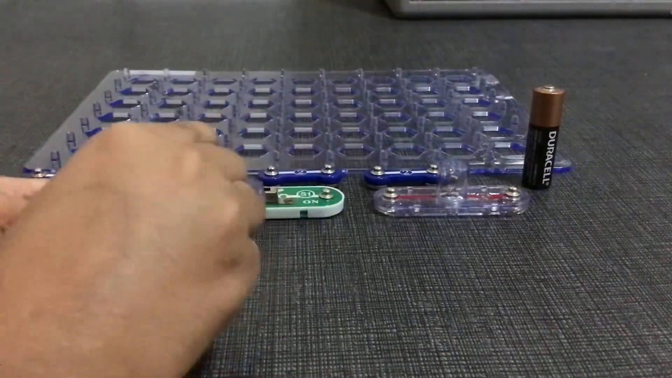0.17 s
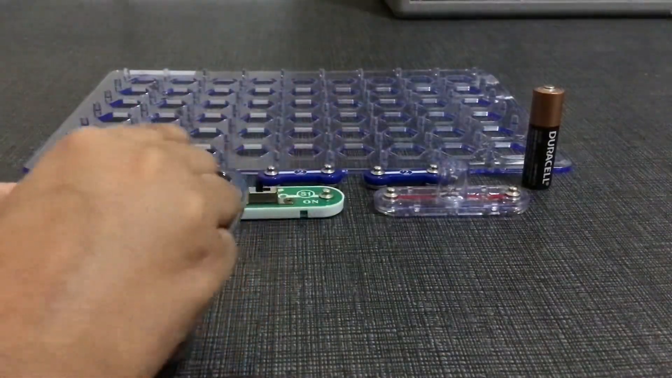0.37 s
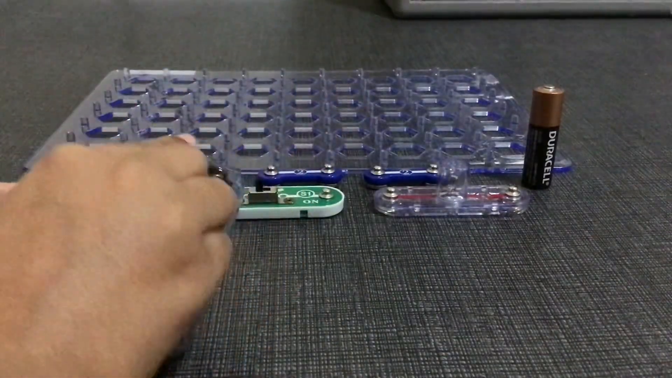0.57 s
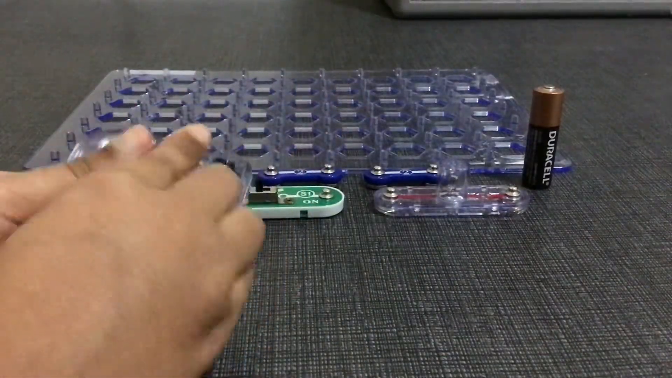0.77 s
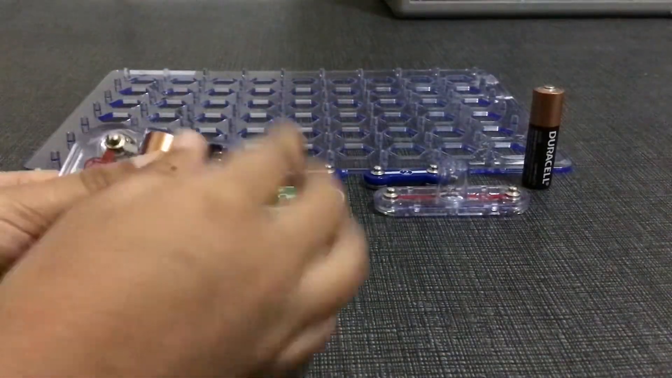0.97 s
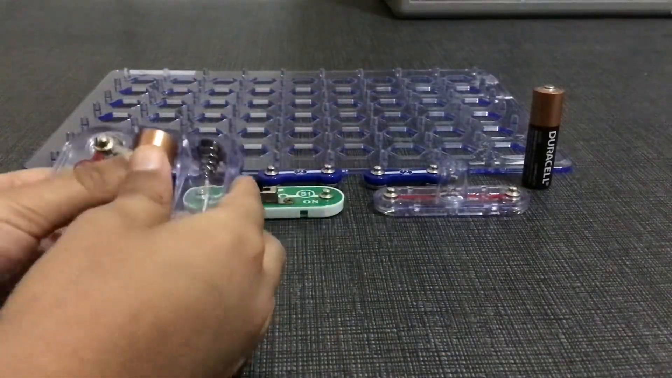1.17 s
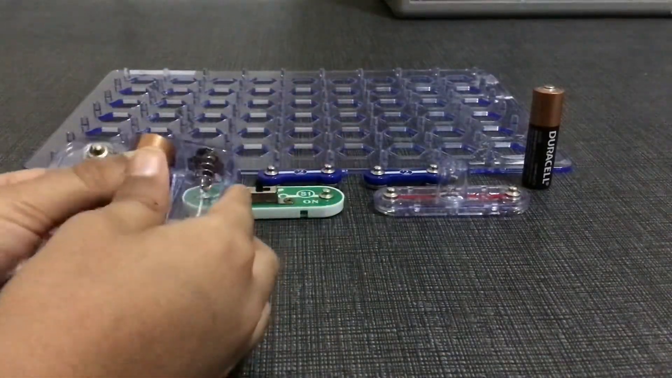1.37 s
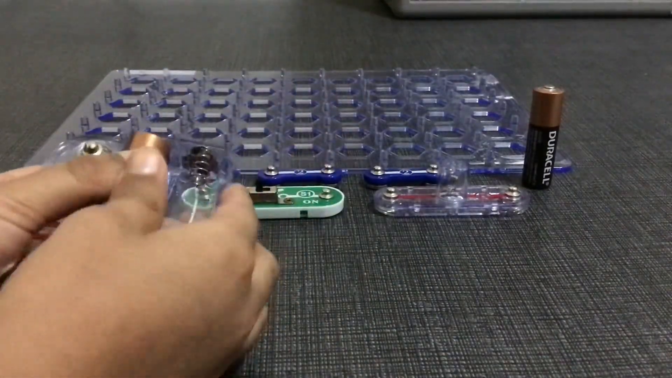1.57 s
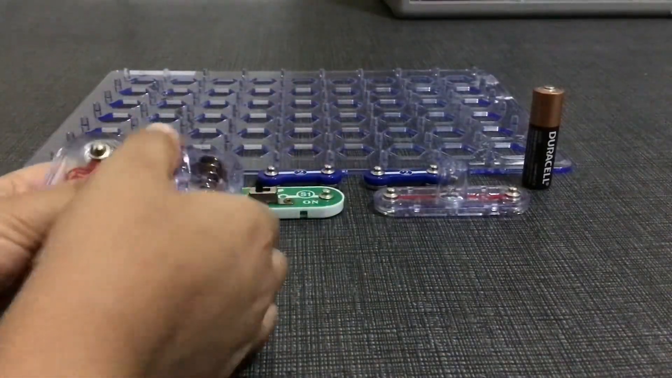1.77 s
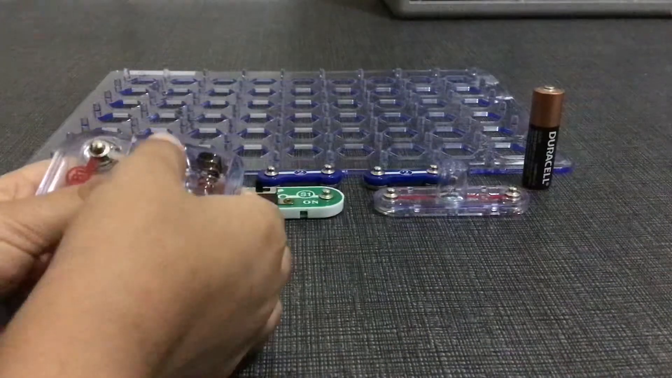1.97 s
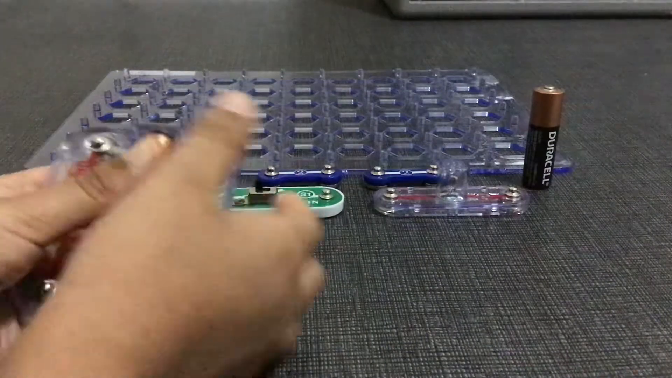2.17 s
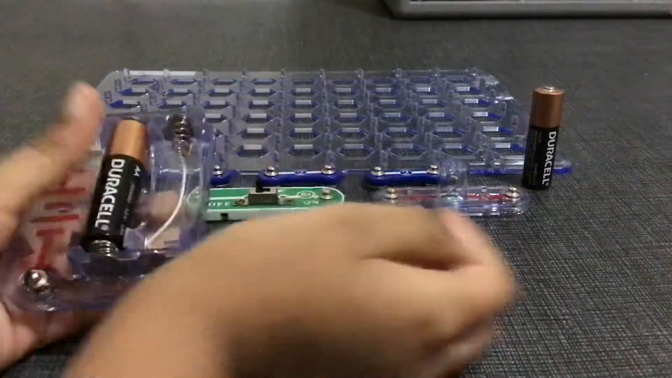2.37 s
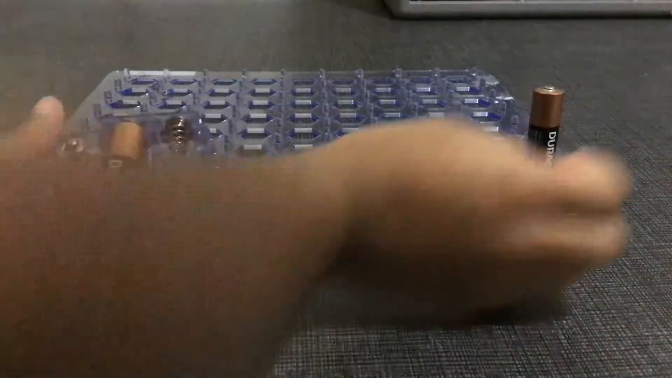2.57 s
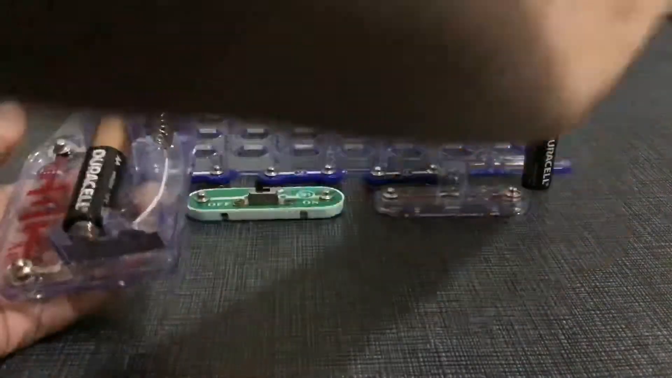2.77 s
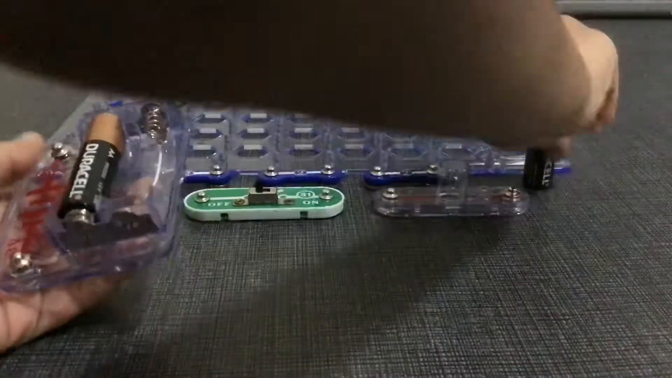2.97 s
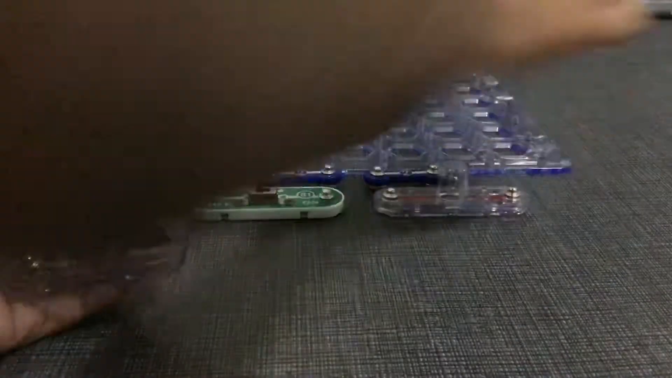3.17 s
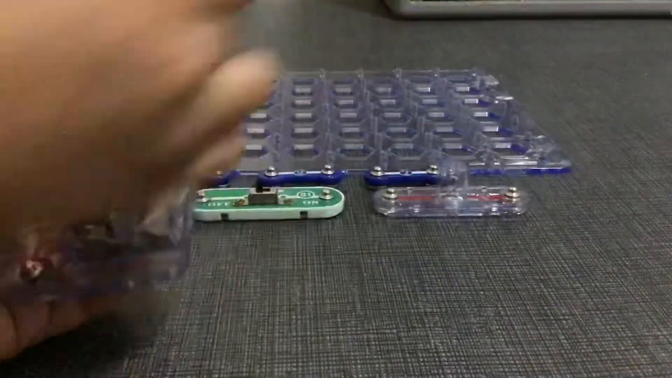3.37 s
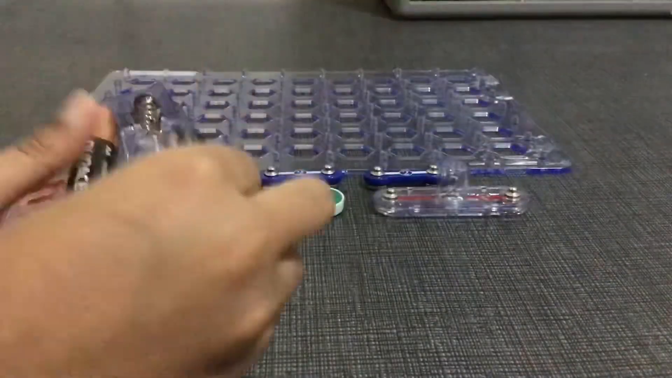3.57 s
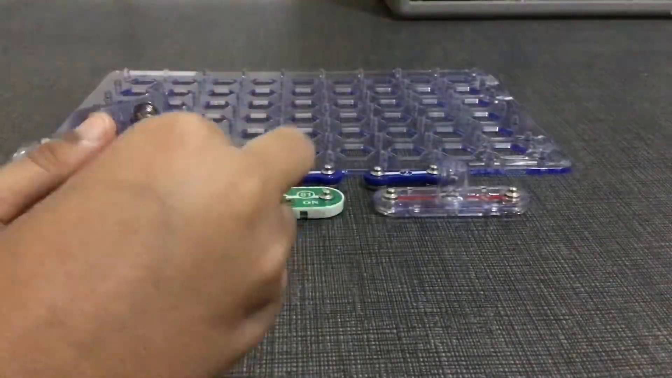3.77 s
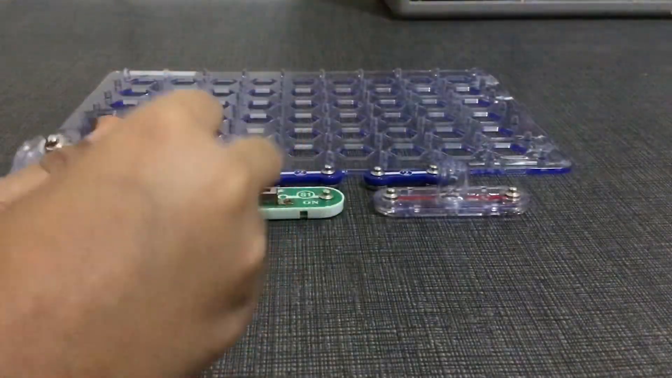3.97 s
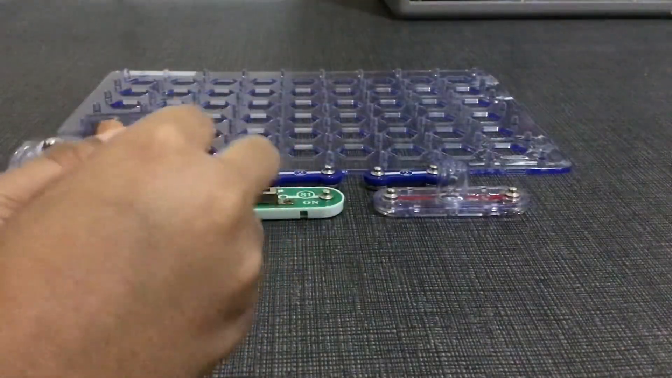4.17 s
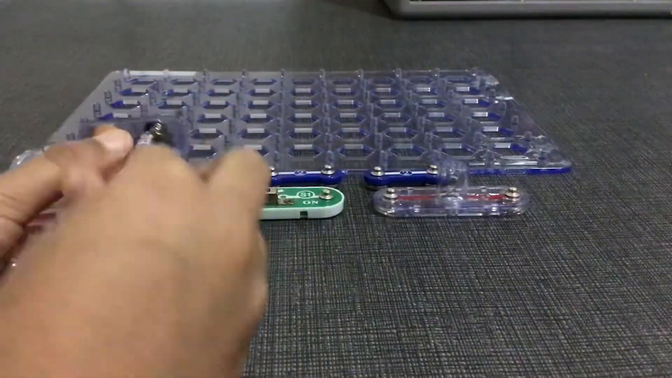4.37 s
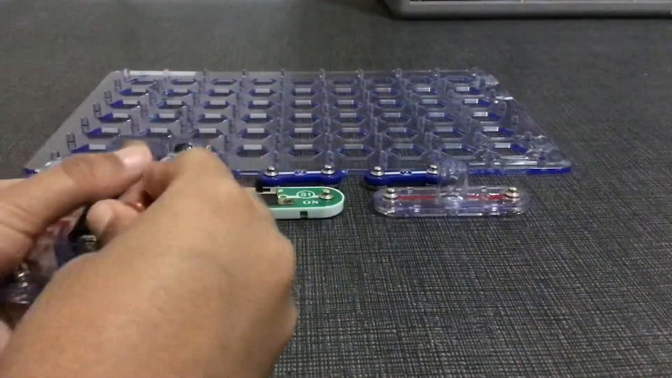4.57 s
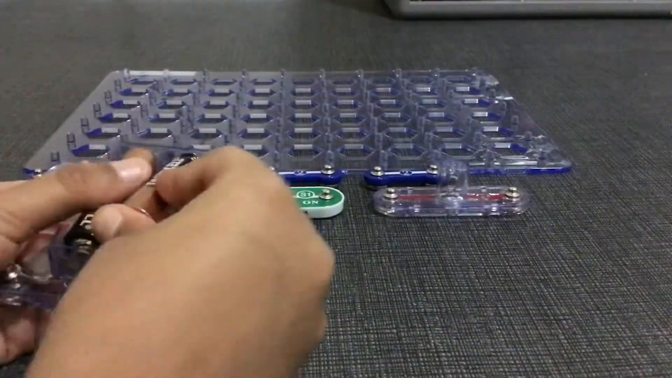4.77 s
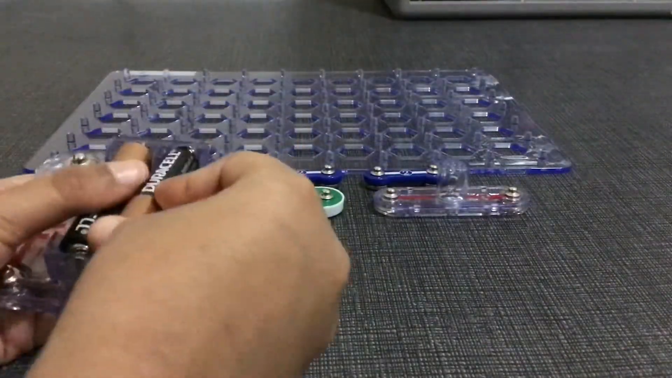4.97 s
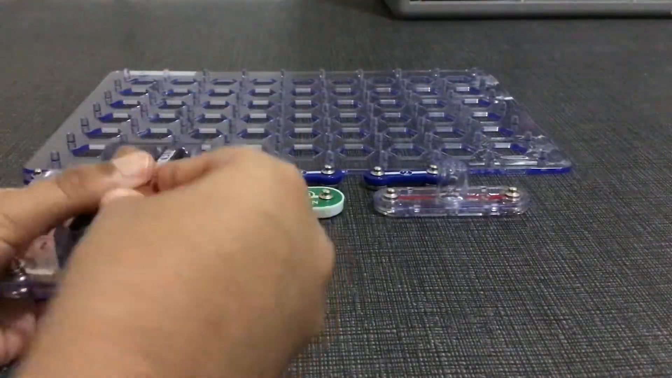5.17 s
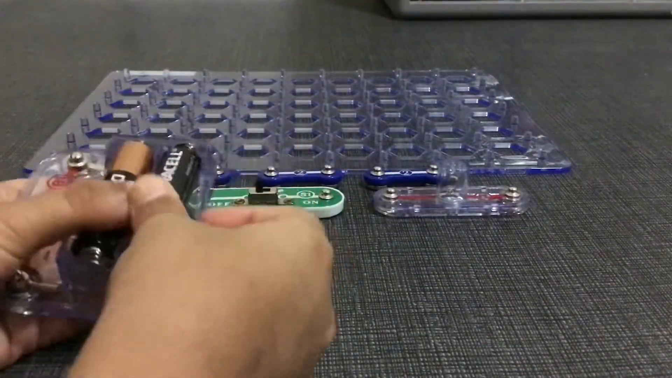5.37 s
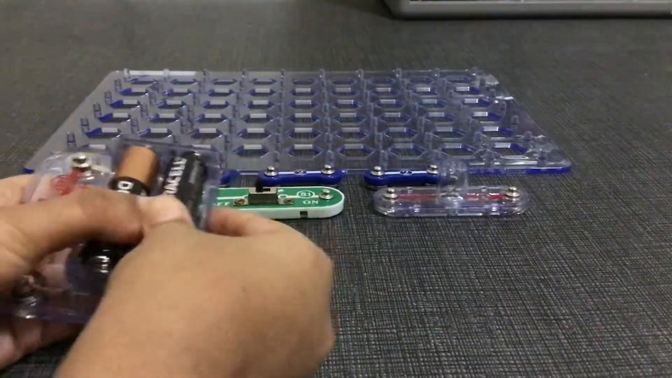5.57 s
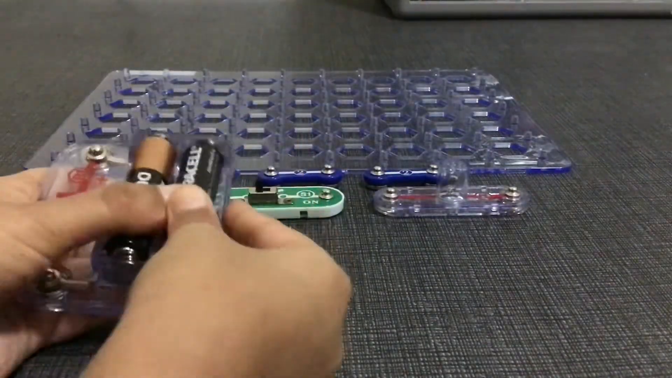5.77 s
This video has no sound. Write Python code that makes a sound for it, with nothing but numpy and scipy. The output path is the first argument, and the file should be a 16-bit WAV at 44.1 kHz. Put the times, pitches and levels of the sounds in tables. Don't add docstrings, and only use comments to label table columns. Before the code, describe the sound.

Close recording of hands fitting two batteries into a plastic holder over a table. Small ticks, soft bumps and skin rubs surround a few very sharp snaps: one at the start, a very loud one before two seconds, then a cluster near four seconds and two more past five. Metal springs ring thinly after the hits, and the room answers briefly over quiet low rumble.

```python
import sys
import numpy as np
from scipy import signal
from scipy.fft import rfft, irfft
from scipy.io import wavfile
from scipy.ndimage import uniform_filter1d

SR = 44100
rng = np.random.default_rng(int(sys.argv[2]) if len(sys.argv) > 2 else 0)


def undo_db(level):
    steps = np.asarray(level, float) / 20
    return 10 ** steps


def materialize(psi):
    bounded = np.clip(np.atleast_2d(psi).T, -1, 1)
    quanta = np.round(bounded * 32767).astype(np.int16)
    wavfile.write(sys.argv[1], SR, quanta)


N = 257169
T = np.arange(N) / SR

# (pitch [Hz], width [Hz], level [dB])
FAN = [
    (296, 1.1, -80.5),
    (486, 1.1, -85),
    (594, 2.6, -85.5),
]
# (time [s], level [dB])
RUMBLE = [(0.3, -69.5), (0.93, -71), (1.07, -71), (1.45, -73), (1.76, -69.5), (1.92, -78.5), (2.15, -77.5),
          (2.47, -74), (3.13, -71.5), (4.18, -71.5), (4.94, -68.5), (5.09, -71.5), (5.31, -73), (5.83, -68)]
RUMBLE_DB, RUMBLE_SWAY_DB = 2, 1.5
SHAKE_DB, SHAKE_DB_PER_S = -46, 186
# (frequency [Hz], level [dB per Hz])
AIR = [(18, -46), (32, -25.5), (65, 0), (118, -2.5), (167, -5), (291, -7.5), (323, -9.5), (432, -12.5),
       (493, -14), (792, -27), (979, -29), (1570, -32.5), (9230, -40.5), (14800, -40.5), (16500, -51.5)]
HISS_DB = -79.5

# (time [s], peak [dB], lead-in before it [dB re peak], room send [dB], treble [dB])
SNAPS = [
    (0.0064, -24.5, -60, -24, -29),
    (1.8104, -1.66, -20.5, -18.5, -39),
    (3.5584, -16, -41, -24, -34),
    (3.6682, -30, -47, -25.5, -20),
    (3.9524, -6, -37, -26, -31.5),
    (5.2097, -7.5, -41.5, -27.5, -33.5),
    (5.5309, 1.5, -33.5, -25, -33),
]
# (pitch [Hz], width [Hz], level [dB])
GRIPS = [
    [(556, 160, 12.5), (1120, 130, 10), (1730, 320, 12), (2510, 220, 10), (4000, 140, -8), (5360, 390, -15),
     (6800, 180, -23)],
    [(2260, 230, 1.5), (2900, 540, -3), (3600, 530, -11), (4200, 590, -18.5), (5340, 260, -21.5),
     (7730, 860, -19.0), (7950, 200, -22.5), (9100, 200, -28.5), (10500, 160, -33.0), (11000, 1700, -25.5),
     (13400, 500, -23.5)] + [(520, 120, -10.0), (2000, 340, -16.5)],
]
# (pitch [Hz], width [Hz], level [dB])
PUSH_GRIPS = [
    [(1548, 460, -5.0), (1970, 56, 2.0), (2640, 263, 4.5), (3170, 100, -2.5), (3620, 310, 2.5), (4466, 217, -4.5), (5800, 201, -16), (8620, 69, -24.5)] + [(1050, 540, -25.5)],
    [(1505, 960, -14.5), (2720, 262, 5), (3900, 610, -5), (5630, 560, -14), (11860, 910, -8.5), (15000, 740, -4.5)],
    [(2590, 370, 0), (3450, 230, 1), (3960, 510, -1), (4670, 140, 0.5), (6050, 107, -9.5), (6850, 230, -13.5), (7900, 150, -34.5), (9450, 800, -29.5), (10160, 100, -30.5), (11700, 160, -27.5)] + [(1700, 379.4, -12.0), (1970, 350, -7)],
]
# (pitch [Hz], width [Hz], level [dB])
SEAT_GRIPS = [
    [(575, 150, -25.5), (987, 184, -15.5), (1895, 130, -3), (2300, 260, -5), (2950, 150, 5),
     (3600, 330, -11.5), (4150, 580, -6), (4600, 170, -17.5), (5990, 130, -21), (7300, 1100, -22.5),
     (11750, 3100, -22.5)],
    [(1140, 160, -21), (2200, 550, -8), (2500, 130, -21.5), (2955, 390, -0.5), (4000, 400, -8),
     (4470, 450, -9.5), (5640, 920, -14), (8270, 190, -22.5), (9600, 500, -15.5), (11470, 240, -20),
     (15000, 520, -27)],
]
# (time after its start [ms], level over the chatter [dB])
HITS = [
    [(1.0, 34), (2.2, 13)],
    [(-0.7, 14), (2.15, 27.5), (3.5, 12)],
    [(.3, 19.5), (.9, 19), (1.9, 17), (3.6, 12)],
    [(.2, 10.5), (2.4, 15), (6, 5.5), (9, 1.5)],
    [(.3, 21), (1.85, 24.5), (2.9, 14.5)],
    [(.5, 10.5), (1.4, 13), (2.2, 19), (2.95, 24)],
    [(.9, 19), (1.4, 24.5), (1.8, 20.5), (2.6, 17)],
]
# (frequency [Hz], level [dB per Hz])
RADIATED = [
    [(410, -42), (700, -10), (2180, -8), (2490, -9), (3330, -29), (12000, -45), (16500, -74.5)],
    [(290, -63.5), (500, -26.5), (1040, -26.5), (1280, -33), (1500, -22.5), (2200, -5.5), (2600, -16),
     (3700, -24.5), (4200, -20.5), (5350, -23.5), (12500, -30), (15600, -34), (16500, -57)],
    [(350, -18.5), (600, -15.5), (1270, -11), (1520, -0.5), (1790, -12.5), (4480, -7), (5590, -20),
     (12500, -36), (16500, -45.5)],
    [(530, -52), (900, -22.5), (2690, -5), (3310, -13), (14300, -15), (16500, -27.5)],
    [(350, -58.5), (600, -27), (1560, -8), (2180, -11.5), (2650, 0.5), (2960, -14.5), (4300, -6.5),
     (13800, -36), (16500, -40)],
    [(350, -58), (600, -20), (1400, -17), (1650, -8), (2950, -2.5), (3400, -14.5), (4540, -14.5),
     (15200, -21.5), (16500, -46)],
    [(290, -61), (500, -30.5), (1040, -9), (1450, -12.5), (1900, -3), (2940, 0), (3450, -12), (4400, -6.5),
     (15100, -21), (16500, -43.5)],
]
SNAP_RATTLE_MS, SNAP_CRACK_DB = 2.5, -23
LEAD_MS = 2
GRIP_MS, GRIP_DB_PER_MS = 1.9, 1.5
LEAD_IN_S = .0222
# (pitch [Hz], width [Hz], level [dB])
SQUEAK = (8000, 260, -12)
RING_SEND_DB = -12

# (delay [s], level [dB])
ECHOES = [
    (.0042, -18),
    (.013, -25),
]
# (frequency [Hz], time to fall 60 dB [s])
ROOM_T60 = [(300, 0.3), (1000, 0.33), (2500, .34), (5000, .36), (9000, 0.3), (13000, 0.16), (16000, 0.24)]

# (time [s], level [dB], first pitch [Hz], last pitch [Hz], length [ms])
THUDS = [(.008, -39, 923, 85, 15), (0.085, -46, 900, 64, 14), (.086, -52, 300, 480, 4),
         (3.56, -58, 900, 100, 10), (3.956, -55, 600, 50, 25), (5.212, -54, 1000, 200, 5),
         (5.536, -54, 500, 50, 30), (1.8115, -20.5, 1395, 8, 27)]
GLIDE_CYCLES = 2.09
# (time [s], level [dB], low pitch [Hz], high pitch [Hz], high level [dB])
BUMPS = [(.012, -34.5, 138.6, 368, -2), (.165, -49.5, 118, 246, -24), (.326, -39.5, 163.4, 230, -6),
         (.655, -55, 95, 158, -1), (1.045, -51.5, 144, 236, -11.5), (1.644, -52, 145, 308, 3),
         (3.008, -42, 167, 269, 1.5), (3.01, -46.5, 392.5, 618, -2.7), (4.618, -51, 212, 297, 4.5),
         (4.871, -49.5, 82, 143, -0.5), (5.534, -56.5, 118, 303, 9)]
BUMP_CYCLES = 15

# (time [s], pitch [Hz], level [dB], swell
# [ms], stopped at [s])
HUMS = [(0.052, 296, -57.5, 62, 1.1), (.42, 372.3, -60, 160, 0.83), (1.451, 272.8, -66.5, 15, 2.2),
        (1.5, 305.7, -67.5, 19, 1.9), (1.829, 477.3, -67.5, 5.7, 3.3)]
HUM_T60_S = 3.1
FINGER_DB_PER_S = 299

# (time [s], peak [dB], main pitch [Hz], treble [dB], rattle length [ms])
TICKS = [(0.0832, -48.5, 2300, -36, 1.5), (0.148, -55, 2300, -7.5, 4.2), (0.304, -62, 2220, -39, 2.7),
         (0.323, -39.5, 2450, -15.5, 3), (0.3445, -44.5, 2180, -9, 2.2), (0.4506, -56.5, 2260, -11, 1.8),
         (0.507, -31.5, 2324, -19.5, 1.03), (0.638, -57.5, 2500, -6, 3), (0.903, -58.5, 2300, -7, 2.7),
         (1.12, -55, 1140, -11, 1.5), (1.638, -67, 2684, -16, 1.9), (1.753, -42.5, 3200, -7, 7.9),
         (3.007, -54, 1000, -28, 2), (3.7595, -58.5, 3626, -20, 2.9), (4.2418, -44, 2905, -20, 2.33),
         (4.2533, -48.5, 2720, -25.5, 1.92), (4.4193, -59.5, 3960, -14, 2), (4.528, -56, 1232, -1, 1.4),
         (4.6159, -53, 4000, -12, 2), (4.667, -38.5, 2950, -45, 2.96), (4.708, -55, 2380, -25, 2.26),
         (4.8663, -45.5, 2640, -10, 6.4), (5.0596, -61.5, 2600, -11, 2.6)]
# (pitch [Hz], width [Hz], level [dB])
PLASTIC = [(1000, 320, -11), (1800, 340, -4), (2600, 230, -7), (4000, 570, -12.5), (6350, 300, -36)]
TICK_HIT_DB, TICK_HIT_AT = 14.5, .45
# (time [s], peak [dB], length [ms], main pitch
# [Hz], second pitch [Hz])
SCRAPES = [(0.152, -64, 20, 2260, 2500), (0.44, -67.5, 37, 2260, 2940), (0.807, -56, 13, 4850, 9250),
           (0.829, -64, 17, 4530, 9500), (0.886, -69, 24, 8150, 5600), (2.305, -66, 3, 15000, 10970),
           (0.511, -60, 6, 5470, 3600), (0.863, -49.5, 16, 6830, 8500), (0.867, -58, 14, 4100, 12700),
           (1.801, -39, 3, 2300, 2900), (3.671, -43, 8.7, 4300, 6515), (4.867, -49.5, 6, 6300, 4000),
           (4.242, -60.5, 2.9, 6000, 4100), (4.655, -67, 14, 5500, 4400), (3, -63, 10.5, 2405, 1050),
           (3.572, -30.5, 1.9, 2680, 3060), (3.9634, -23, 6.2, 2640, 3650), (4.136, -55.5, 7.3, 1700, 2600),
           (4.466, -57, 8.7, 2190, 2870), (4.482, -62.5, 14, 3620, 4310), (4.619, -57.5, 35, 2300, 2760),
           (4.626, -57, 2.2, 12580, 11400), (4.838, -60, 2.76, 12600, 15000), (4.877, -51, 5.8, 8780, 2980),
           (4.936, -69, 2.4, 15000, 13620), (5.084, -63, 3.8, 14470, 12720), (5.545, -30, 2.4, 2700, 5130)]

# (start [s], firmest [s], end [s], level [dB], drop at the ends [dB])
RUBS = [(0.64, 0.834, 1.01, -80.5, 11), (1.563, 1.672, 1.77, -85.5, -2.5), (2.17, 2.266, 2.66, -80.5, 12),
        (2.316, 2.405, 2.47, -71.5, 9), (2.411, 2.499, 2.3, -70.5, 2), (4.21, 4.279, 4.61, -80.5, 7),
        (4.792, 4.849, 5.15, -81.5, 16.5)]
# (frequency [Hz], level [dB per Hz])
RUB = [(590, -63.5), (1100, -14), (2250, -8.5), (3050, -3.5), (6460, -7.5), (8000, -8.5), (14800, -5.5),
       (15900, -6.5), (16500, -45.5)]

# (pitch [Hz], width [Hz], level [dB], time to fall 60 dB [s])
SLOT = [
    (2235, 150, -30, 0.45),
    (4400, 300, -47, .35),
    (5250, 350, -47, .45),
]
SLOT_S, SLOT_SWELL_MS = 1.815, 22
LOW_HZ, PAIR_LOW_HZ, PAIR_HIGH_HZ, TOP_HZ = 1898, 3499, 3638, 4366
# (time [s], pitch [Hz], level [dB], time to fall 60 dB [s], stopped at [s])
SPRINGS = [(1.83, PAIR_HIGH_HZ, -67, 1.1, 2.15), (3.562, LOW_HZ, -60, 0.63, 3.9),
           (3.562, PAIR_HIGH_HZ, -60, .95, 3.93), (3.562, PAIR_LOW_HZ, -63, 1.1, 3.93),
           (3.562, TOP_HZ, -47.5, 0.26, 3.7), (3.562, 1532, -46, 0.2, 4.9), (3.562, 2670, -45, 0.23, 4.7),
           (3.562, 3980, -51, 0.24, 4.6), (3.562, 3140, -54, 0.2, 4.6),
           (3.956, PAIR_LOW_HZ, -46, .65, 4.19), (3.956, PAIR_HIGH_HZ, -53, 0.55, 4.19),
           (3.955, 2630, -49, 0.39, 5.8), (3.956, 4350, -46, .2, 5.1), (3.956, 4010, -50, .2, 5),
           (3.956, 4700, -49.5, .2, 5.7), (3.956, 2500, -52, .3, 4.3), (1.82, 4360, -50, .25, 2.2),
           (3.956, LOW_HZ, -66, 0.97, 4.2), (4.968, 2680, -74, 0.32, 5.1), (4.968, 3260, -70, 0.11, 5.4),
           (4.968, 3850, -65, 0.087, 4.9)]
PLUCK_MS = 2.8


def rms_one(x):
    return x / np.sqrt(np.mean(x ** 2) + 1e-20)


def at_hz(points, hz):
    table_hz, values = np.transpose(points)
    return np.interp(np.log(hz + 1), np.log(table_hz), values)


def shape(x, spectrum):
    gain = undo_db(at_hz(spectrum, np.fft.rfftfreq(len(x), 1 / SR)))
    return irfft(rfft(x) * gain, len(x))


def coloured(spectrum):
    return rms_one(shape(rng.standard_normal(N), spectrum))


def drift(rate):
    steps = rng.standard_normal(int(N / SR * 40) + 2)
    memory = np.exp(-2 * np.pi * rate / 40)
    smooth = rms_one(signal.lfilter([1], [1, -memory], steps))
    return np.interp(T * 40, np.arange(len(steps)), smooth)


def resonate(x, hz, width):
    r = np.exp(-np.pi * width / SR)
    top = (1 - r * r) / 2
    return signal.lfilter([top, 0, -top], [1, -2 * r * np.cos(2 * np.pi * hz / SR), r * r], x)


def add(out, s, sound):
    i = round(s * SR)
    out[i:i + len(sound)] += sound[:N - i]


def swell(s, t60, swell_ms):
    t = np.maximum(T - s, 0)
    return (1 - np.exp(-t * 1000 / swell_ms)) * undo_db(-60 * t / t60)


def air():
    fan = np.zeros(N)
    for hz, width, db in FAN:
        level = undo_db(db + 1.5 + 1.8 * drift(width))
        fan += level * np.sin(2 * np.pi * hz * T + drift(width))
    no_bass = signal.butter(4, 48, "high", fs=SR, output="sos")
    noise = signal.sosfilt(no_bass, coloured(AIR))
    low = signal.sosfiltfilt(signal.butter(2, 700, fs=SR, output="sos"), noise)
    rumble_db = RUMBLE_DB + np.interp(T, *np.transpose(RUMBLE)) + RUMBLE_SWAY_DB * drift(3.6)
    rumble_level = undo_db(rumble_db) + undo_db(SHAKE_DB - SHAKE_DB_PER_S * T)
    return rumble_level * rms_one(low) + undo_db(HISS_DB) * rms_one(noise - low) + fan


def shake(modes, force, strike=0):
    unevenness = undo_db(1.8 * rng.standard_normal(len(force)))
    chatter = strike + force * rng.standard_normal((len(modes), len(force))) * unevenness
    body = np.zeros(len(force))
    for push, (hz, width, db) in zip(chatter, modes):
        ring = resonate(resonate(push, hz, width), hz, 2.2 * width)
        body += undo_db(db) * np.sqrt(width) * rms_one(ring)
    return body / np.abs(body).max()


def contact(modes, rattle_ms, crack_db, treble_db, hits):
    ms = np.arange(2700) / SR * 1000 - LEAD_MS
    t = np.clip(ms * .8 / rattle_ms, 0, 1)
    rattle = t ** 0.25 * (1 - t) ** 0.39
    strike = np.zeros(len(ms))
    for at_ms, db in hits:
        strike[np.argmax(ms > at_ms)] += undo_db(db)
    crack = [(3200, 1700, crack_db), (11100, 3500, treble_db)]
    damp_from_ms = max(hits[-1][0], rattle_ms) + GRIP_MS
    grip = undo_db(-GRIP_DB_PER_MS * np.maximum(ms - damp_from_ms, 0))
    return grip * shake(modes + crack, rattle, strike)


def lead_in(modes):
    t = np.arange(round(LEAD_IN_S * SR)) / SR
    first_tick = 1.2 * np.exp(-t / 0.00044)
    scrape = 0.06 + 1.5 * np.exp((t - LEAD_IN_S) / .006)
    lower_modes = [mode for mode in modes if mode[0] < 9000]
    return shake(lower_modes + [SQUEAK], first_tick + scrape)


def snaps():
    direct, send = np.zeros(N), np.zeros(N)
    grips = GRIPS + PUSH_GRIPS + SEAT_GRIPS
    for event, modes, colour, hits in zip(SNAPS, grips, RADIATED, HITS):
        s, db, lead_in_db, send_db, treble_db = event
        snap = contact(modes, SNAP_RATTLE_MS, SNAP_CRACK_DB, treble_db, hits)
        add(direct, s - LEAD_MS / 1000, undo_db(db) * snap)
        if s > LEAD_IN_S:
            add(direct, s - LEAD_IN_S, undo_db(db + lead_in_db) * lead_in(modes))
        click = shape(np.arange(512) == 128, colour)
        click = click / np.sqrt(np.sum(click ** 2))
        add(send, s, 4 * undo_db(db + send_db) * click)
        add(send, s, undo_db(db + send_db + RING_SEND_DB) * snap)
    return direct, send


def echoes(x):
    out, dull = x.copy(), resonate(x, 1500, 3700)
    for s, db in ECHOES:
        add(out, s, undo_db(db) * dull)
    return out


def room(x):
    t = np.arange(SR * 3 // 4) / SR
    tail = np.zeros(len(t))
    edges = 200 * 2 ** np.arange(0, 6.6, .5)
    for low, high in zip(edges, edges[1:]):
        band_filter = signal.butter(2, [low, high], "band", fs=SR, output="sos")
        band = signal.sosfilt(band_filter, rng.standard_normal(len(t)))
        tail += band * undo_db(-60 * t / at_hz(ROOM_T60, np.sqrt(low * high)))
    lumps = np.repeat(rng.standard_normal(len(t) // 128 + 1), 128)[:len(t)]
    build_up = 1 - .8 * np.exp(-np.maximum(t - .006, 0) / .009)
    tail = tail * build_up * undo_db(3.2 * lumps * np.exp(-t / .06))
    return signal.fftconvolve(x, tail / np.sqrt(np.sum(tail ** 2)))[:N] * undo_db(8.5)


def thuds():
    out = np.zeros(N)
    ms = np.arange(SR // 4) / SR * 1000
    for s, db, first_hz, last_hz, length_ms in THUDS:
        pitch = last_hz + first_hz / (1 + ms * first_hz / 1000 / GLIDE_CYCLES)
        phase = 2 * np.pi * np.cumsum(pitch) / SR
        wave = np.sin(phase) + 0.083 * np.sin(phase + 1.6) * np.exp(-ms / 25)
        rise = (1 - np.exp(-ms / 2.2)) * (.35 + 2.3 * ms / length_ms)
        add(out, s, undo_db(db) * rise * np.exp(-(ms / length_ms) ** 2) * wave)
    return out


def bumps():
    out = np.zeros(N)
    t = np.arange(SR // 4) / SR
    for s, db, low_hz, high_hz, high_db in BUMPS:
        t60 = BUMP_CYCLES / low_hz
        low = (1 - np.exp(-t / 0.0049)) * np.sin(2 * np.pi * low_hz * t)
        high = (1 - np.exp(-t / 0.0015)) * np.sin(2 * np.pi * high_hz * t)
        high = undo_db(high_db - 30 * t / t60) * high
        add(out, s, undo_db(db - 60 * t / t60) * (low + high))
    return out


def spring_tone(s, hz, db, t60, swell_ms, stop):
    finger_db = -FINGER_DB_PER_S * np.maximum(T - stop, 0)
    return undo_db(db + finger_db) * swell(s, t60, swell_ms) * np.sin(2 * np.pi * hz * T)


def hums():
    return sum(spring_tone(s, hz, db, HUM_T60_S, swell_ms, stop) for s, hz, db, swell_ms, stop in HUMS)


def ticks():
    out = np.zeros(N)
    for s, db, hz, treble_db, rattle_ms in TICKS:
        hits = [(TICK_HIT_AT * rattle_ms, TICK_HIT_DB)]
        tick = contact(PLASTIC + [(hz, 400, -1)], rattle_ms, -25.0, treble_db - 9, hits)
        add(out, s - LEAD_MS / 1000, undo_db(db) * tick)
    return out


def scrapes():
    out = np.zeros(N)
    for s, db, length_ms, main_hz, second_hz in SCRAPES:
        modes = [(main_hz, 150 + .08 * main_hz, 0), (second_hz, 150 + .08 * second_hz, -3)]
        hits = [(TICK_HIT_AT * length_ms, TICK_HIT_DB)]
        scrape = contact(modes, length_ms, -15.5, -23.5, hits)
        add(out, s - LEAD_MS / 1000, undo_db(db) * scrape)
    return out


def rubs():
    level = np.zeros(N)
    for start, firmest, end, db, light_db in RUBS:
        press_db = np.interp(T, [start, firmest, end], [db - light_db, db, db - light_db])
        fade = np.clip(np.minimum(T - start, end - T) / 0.04, 0, 1)
        level += undo_db(press_db) * fade
    hiss = coloured(RUB)
    hiss = hiss + 0.5 * np.roll(hiss, round(SR / 2050))
    return level * undo_db(3.1 + .7 * drift(15)) * hiss


def slot():
    out = np.zeros(N)
    for hz, width, db, t60 in SLOT:
        hollow = resonate(resonate(rng.standard_normal(N), hz, width), hz, 2 * width)
        hollow = hollow / np.sqrt(uniform_filter1d(hollow ** 2, size=1300))
        out += undo_db(db) * swell(SLOT_S, t60, SLOT_SWELL_MS) * hollow
    return out


def springs():
    return sum(spring_tone(s, hz, db, t60, PLUCK_MS, stop) for s, hz, db, t60, stop in SPRINGS)


def scene():
    background = air()
    direct, send = snaps()
    light = ticks() + scrapes()
    light_send = undo_db(-22) * resonate(light, 2400, 1500)
    holder = echoes(direct + light) + room(send + light_send)
    table = thuds() + bumps()
    ringing = hums() + slot() + springs()
    return (background + holder + table + ringing + rubs())[None]


def low_pass(x):
    return signal.sosfilt(signal.butter(12, 16990, fs=SR, output="sos"), x)


def record(dry):
    rounded = 1.5 * np.tanh(dry / 1.5)
    treble_cut = signal.cheby2(14, 80, 17200, fs=SR, output="sos")
    mix = signal.sosfilt(treble_cut, rounded)
    return low_pass(mix)


dry = scene()
out = record(dry)
materialize(out)
```